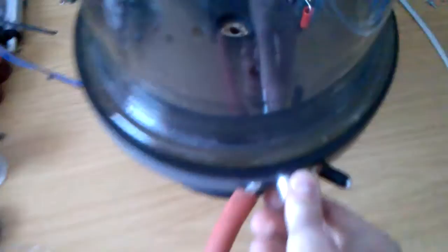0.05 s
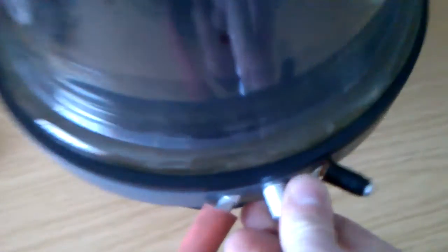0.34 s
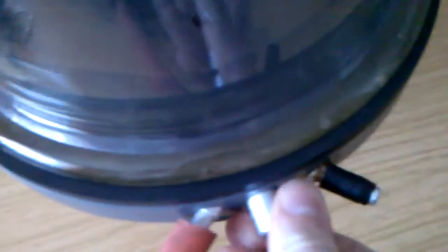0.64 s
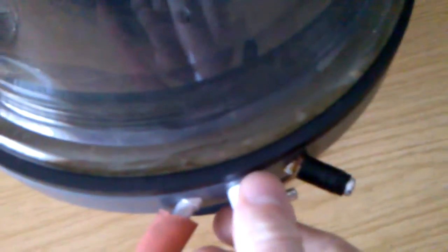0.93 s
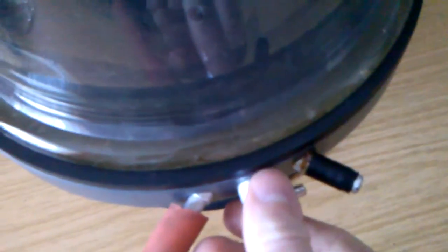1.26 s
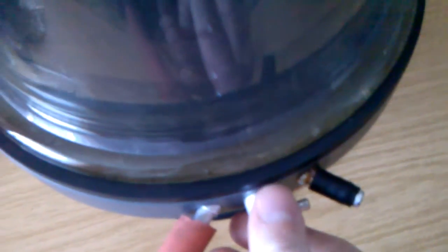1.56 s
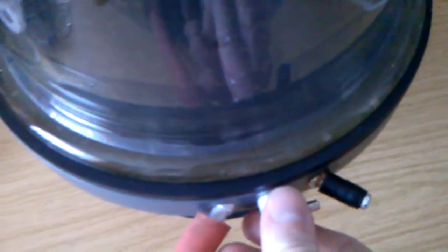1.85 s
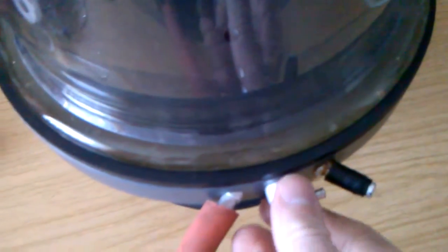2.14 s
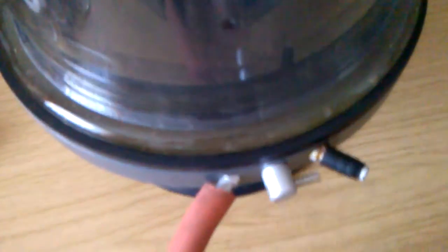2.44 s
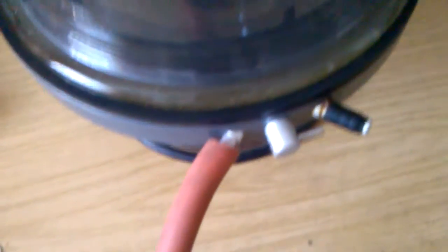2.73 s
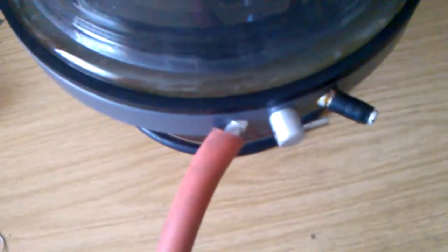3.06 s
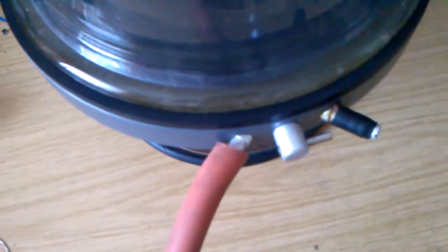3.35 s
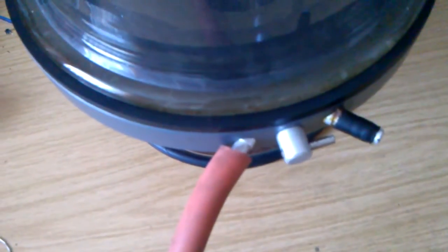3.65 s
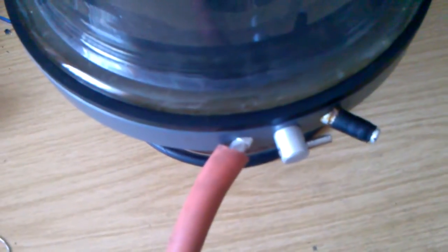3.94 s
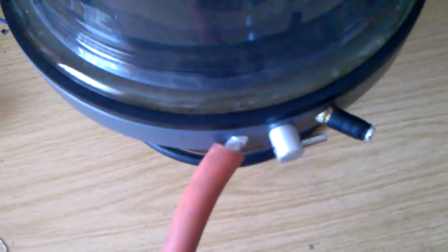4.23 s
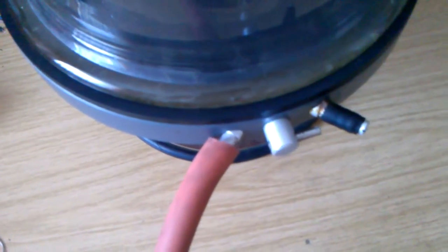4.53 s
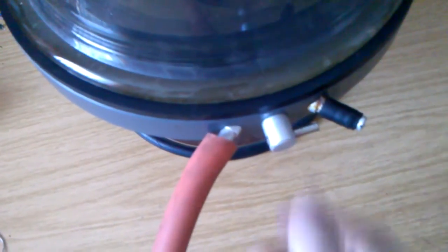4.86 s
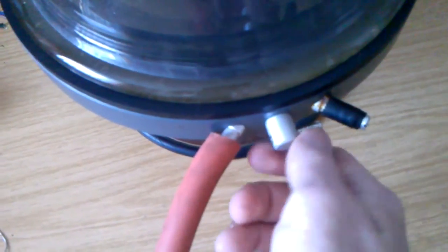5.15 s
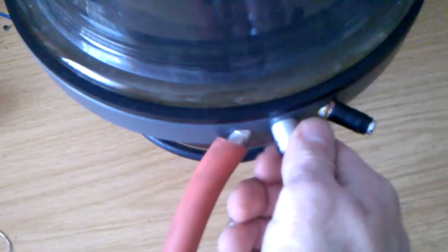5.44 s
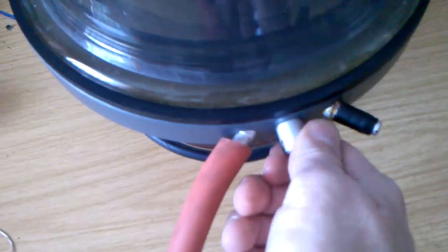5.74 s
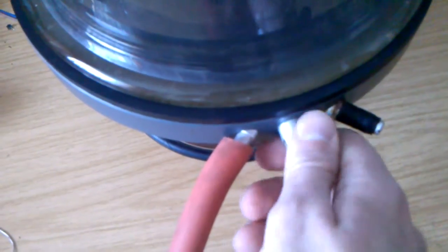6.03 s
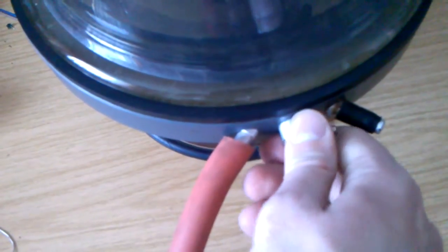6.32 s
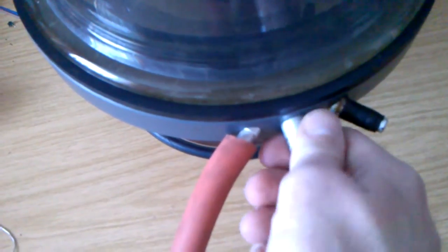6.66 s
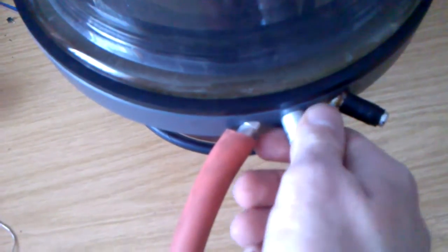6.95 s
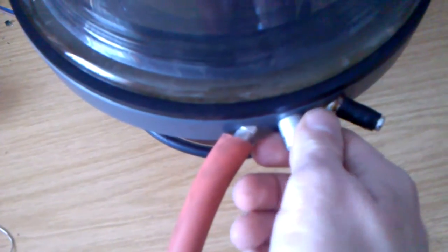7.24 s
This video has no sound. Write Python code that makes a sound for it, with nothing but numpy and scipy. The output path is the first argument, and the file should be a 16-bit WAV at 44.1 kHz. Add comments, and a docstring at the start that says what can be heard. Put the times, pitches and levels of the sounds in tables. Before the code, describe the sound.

Air rushes through a small screw valve on the base of a glass vacuum jar, making a loud, steady, high hiss. As the knob opens, a thin squeal and breathy whistles join in. The squeal dies away, and the main whistle gives way to higher ones. The hiss changes colour slightly as the hand lets go and returns. The microphone is close, with faint motor hum and room rumble underneath.

```python
"""Air rushes through a small screw valve on the base of a glass vacuum bell jar, over faint motor hum
and room rumble. The knob opens in the first half second: the jet hisses and squeals, and the valve's
passages ring with breathy tones. Near 2.4 s the hand lets go, shifting the echoes from fingers and
table that colour the hiss; three soft bumps follow. The main whistle fades as higher ones take over.
Near 4.6 s the hand returns, and the jet again rings the hollow of the fingers."""
import sys
import numpy as np
from scipy import signal
from scipy.fft import rfft, irfft, next_fast_len
from scipy.io import wavfile
from scipy.ndimage import map_coordinates

SR = 44100
rng = np.random.default_rng(int(sys.argv[2]) if len(sys.argv) > 2 else 0)


def master_out(mix):
    """Clip the mix to full scale and print it as 16-bit PCM to the path in sys.argv[1]."""
    frames = np.transpose(np.atleast_2d(mix))
    ceiling = np.clip(frames, -1, 1)
    pcm = np.round(ceiling * 32767).astype(np.int16)
    wavfile.write(sys.argv[1], SR, pcm)


N = 321489
TIME = np.arange(N) / SR


def amp(db):
    """Decibels to gain."""
    return 10 ** (np.asarray(db) / 20)


def unit(x):
    """Scale to rms 1."""
    return x / np.sqrt(np.mean(x ** 2) + 1e-20)


def ramp(start_s, length_s):
    """Linear rise from 0 to 1."""
    return np.clip((TIME - start_s) / length_s, 0, 1)


def curves(rows):
    """Per-sample curve for each column after the time."""
    times_s, *columns = np.transpose(rows)
    return [np.interp(TIME, times_s, column) for column in columns]


def wobble(rate_hz):
    """Smooth random curve with knots at rate_hz."""
    return map_coordinates(rng.standard_normal(int(N * rate_hz / SR) + 4), [TIME * rate_hz])


def filtered(x, response):
    """Apply the gain response(hz)."""
    size = next_fast_len(N + 8192)
    return irfft(rfft(x, size) * response(np.fft.rfftfreq(size, 1 / SR)), size)[..., :N]


def noise(spectrum):
    """Noise of rms 1, shaped by rows of freq_hz, relative_db."""
    freq_hz, db = np.transpose(spectrum)
    shape = lambda hz: amp(np.interp(np.log(hz + 1), np.log(freq_hz), db, left=-120, right=-120))
    return unit(filtered(rng.standard_normal(N), shape))


def ringing(modes):
    """Turbulence in narrow, steep-skirted resonances; rms 1."""
    def shape(hz):
        gains = [amp(db) / (1 + ((hz - pitch_hz) / width_hz) ** 2) for pitch_hz, width_hz, db in modes]
        return np.sqrt(sum(gain ** 2 for gain in gains))
    return unit(filtered(rng.standard_normal(N), shape))


def gliding(centre_hz, width_hz):
    """Noise in one resonance that may move; rms 1."""
    slow = filtered(rng.standard_normal((2, N)), lambda hz: 1 / (1 + (hz / width_hz) ** 2))
    phase = 2 * np.pi * np.cumsum(centre_hz * np.ones(N)) / SR
    return unit(slow[0] * np.cos(phase) + slow[1] * np.sin(phase))


# Motor and mains lines: pitch_hz, rms_db
HUM_LINES = [(50, -91), (100, -88), (120, -96.5), (199, -93.5)]

def motor_hum():
    """Motor and mains hum, slightly unsteady in level and phase."""
    hum = np.zeros(N)
    for pitch_hz, rms_db in HUM_LINES:
        peak = np.sqrt(2) * amp(rms_db + 1.8 * wobble(2.1))
        hum += peak * np.sin(2 * np.pi * pitch_hz * TIME + 0.67 * wobble(4.4))
    return hum


# Room rumble spectrum: freq_hz, relative_db
RUMBLE_SPECTRUM = [(12, -26), (20, 6.5), (59, -3.5), (267, -16.5), (600, -19), (780, -57), (1320, -120)]

def room_rumble():
    """Wavering rumble plus a faint, steady low-mid band."""
    rumble = amp(-70 + 0.7 * wobble(5.5)) * noise(RUMBLE_SPECTRUM)
    return rumble + amp(-87) * noise([(150, -12), (400, 2), (750, -1), (1500, -22)])


# Handling bumps: centre_s, level_db (before boost), pitch_hz
HANDLING_BUMPS = [(2.465, -58, 53.7), (3.211, -63, 56.5), (3.674, -59.5, 53.8)]

def bumps(width_s=0.0079, boost_db=4.5):
    """Each handling bump is one soft, low push."""
    pushes = np.zeros(N)
    for centre_s, level_db, pitch_hz in HANDLING_BUMPS:
        t = TIME - centre_s
        pushes += amp(level_db + boost_db) * np.exp(-(t / width_s) ** 2) * np.cos(2 * np.pi * pitch_hz * t)
    return pushes


def opening_db(shut_db=-11, turn_s=0.47):
    """Flow builds as the knob turns open, fast at first."""
    return shut_db * (1 - ramp(0, turn_s)) ** 1.7


def flow(open_db, drift_db_per_s):
    """Gain that rises with the opening and drifts as the jar's pressure changes."""
    return amp(open_db + opening_db() + drift_db_per_s * TIME)


# Resonance levels without swells: name -> level_db
RESTING_DB = {"bore": -61.5, "whistle": -63.5, "overtone": -72.5, "upper": -74.5, "seat": -63, "squeal":
              -82.5}
# Resonance swells: name, crest_s, half_width_s, rise_db
FLOW_SWELLS = [("bore", 0.49, 0.22, 3.8), ("bore", 1.47, 0.29, 3), ("bore", 6.3, 1.1, 1.9),
               ("whistle", 1.13, 1.46, 10.8), ("whistle", 0.57, .2, 2.7), ("whistle", 3.8, 1, 2.7),
               ("whistle", 5.2, 0.13, 3.1), ("overtone", 5.6, 4.8, 11.8), ("overtone", 3.05, 0.09, 4.3),
               ("upper", 4.1, 4.4, 15.6), ("seat", 3.7, 1.4, 4.9), ("seat", 2.22, 0.18, 5.8),
               ("squeal", 0.74, 1.2, 35)]

def drive(resonance, steepness=1.7):
    """Gain of a resonance: rises with the opening, swells while the flow suits it."""
    swell_db = sum(rise_db / (1 + ((TIME - crest_s) / half_width_s) ** 2)
                   for name, crest_s, half_width_s, rise_db in FLOW_SWELLS if name == resonance)
    return amp(RESTING_DB[resonance] + steepness * opening_db() + swell_db)


# Rush spectra in the passages: freq_hz, relative_db
LOW_SPECTRUM = [(400, -27), (560, -10), (760, -4.5), (830, 2.5), (900, 3), (960, -5.5), (1040, 3.5),
                (1250, -6.5), (1600, -25)]
MID_SPECTRUM = [(800, -55), (1150, -3), (1400, -3.5), (1650, 2), (2050, -1), (2300, -4), (2900, -61)]
BORE_SPECTRUM = [(1900, -28), (2350, -3), (2600, -5.5), (3100, -1.5), (3340, -9.5), (3740, -14.5),
                 (3870, -5.5), (4400, -17)]
# Bore resonances: pitch_hz, half_width_hz, relative_db
BORE_RESONANCES = [(1222, 53, -19.5), (1552, 21, -8.5), (2446, 15, -2), (2711, 19.7, 1), (2904, 18, -3)]

def passages():
    """Duller rush inside valve and base; the low band fades as the middle band grows."""
    low = flow(open_db=-69, drift_db_per_s=-0.65) * noise(LOW_SPECTRUM)
    middle = flow(open_db=-66.5, drift_db_per_s=0.66) * noise(MID_SPECTRUM)
    bore = drive("bore", steepness=0.98) * noise(BORE_SPECTRUM)
    ring = flow(open_db=-62, drift_db_per_s=0.05) * ringing(BORE_RESONANCES)
    return low + middle + bore + ring


# Whistling resonances of the passages: pitch_hz, half_width_hz, relative_db
WHISTLE_MODES = [(3514, 19, -1), (3574, 33, 0), (3628, 20, -6)]
OVERTONE_MODES = [(4670, 26, 0), (4843, 24, -9)]
UPPER_MODES = [(5092, 27, 0), (5205, 26, -10), (5407, 30, -3), (5727, 40, -7)]
SEAT_MODES = [(6043, 26, -7), (6200, 55, 0)]

def whistles(waver_db=1.0):
    """Breathy tones, each wavering on its own; the main one fades and higher ones take over."""
    tones = {"whistle": WHISTLE_MODES, "overtone": OVERTONE_MODES,
             "upper": UPPER_MODES, "seat": SEAT_MODES}
    return sum(drive(name) * amp(waver_db * wobble(10)) * ringing(modes) for name, modes in tones.items())


def squeal():
    """The jet squeals in the narrow gap, loudest early on."""
    return drive("squeal") * gliding(centre_hz=13230, width_hz=110)


# Finger moves at the knob: start_s, length_s, glide_s, from_hz, to_hz, half_width_hz, level_db
FINGER_MOVES = [(.23, 0.63, 0.67, 13900, 10900, 650, -41.5), (.72, 1.6, .15, 10960, 10660, 260, -45.5),
                (2.27, .13, .1, 14100, 12500, 2000, -47), (4.87, 0.1, 0.11, 8600, 9700, 384, -44),
                (5.05, .38, .15, 10700, 11200, 600, -48), (5.953, 0.19, .2, 9750, 9600, 350, -42)]

def finger_hollow(attack_s=0.039, release_s=0.09, sag_db_per_s=6.5):
    """The jet rings the hollow of the fingers; each move glides, slows and fades."""
    ring = np.zeros(N)
    for start_s, length_s, glide_s, from_hz, to_hz, half_width_hz, level_db in FINGER_MOVES:
        pitch_hz = to_hz + (from_hz - to_hz) * (1 - ramp(start_s, glide_s)) ** 2
        gate = ramp(start_s, attack_s) * (1 - ramp(start_s + length_s - release_s, release_s))
        sag_db = sag_db_per_s * length_s * ramp(start_s, length_s)
        ring += gate * amp(level_db - sag_db) * gliding(pitch_hz, half_width_hz)
    return ring


def glass_scatter(x, wet_db=-8, t60_s=0.018):
    """Short spray of reflections from the glass; changes as hand and microphone move."""
    t = TIME[:SR // 20]
    tails = rng.standard_normal((3, len(t))) * amp(-60 * t / t60_s) * (t > 0.0015)
    sprays = signal.fftconvolve(x[None], tails / np.linalg.norm(tails[0]), axes=1)[:, :N]
    shares = np.array([wobble(1) for _ in sprays])
    return amp(wet_db) * (sprays * shares).sum(0) / np.linalg.norm(shares, axis=0)


def echo(x, delay_s):
    """One reflection with a moving delay."""
    oversampled = signal.resample_poly(x, 4, 1)
    return np.interp(TIME - delay_s, np.arange(len(oversampled)) / (4 * SR), oversampled)


def holding(back_s, let_go_s=2.42, reach_s=0.34):
    """1 with the knob held, 0 from let_go_s to back_s."""
    return 1 - ramp(let_go_s - reach_s / 2, reach_s) + ramp(back_s - reach_s / 2, reach_s)


def table_echo(x, back_s):
    """The table combs the hiss; its echo is earlier and stronger from letting go until back_s."""
    held = holding(back_s)
    delay_ms = np.interp(held, [0, 1], [0.697, 0.729])
    gain = np.interp(held, [0, 1], [0.33, 0.2])
    return gain * echo(x, delay_ms / 1000)


# Echo path via the fingers, beyond the direct path: time_s, extra_cm
FINGER_DETOUR = [(0, 7.3), (2.3, 7.1), (2.6, 14), (4.7, 14), (4.87, 8.1), (5.25, 6.2), (6.2, 3.9)]

def finger_echo(x, back_s, mirror_cm=0.65, sound_cm_per_s=34300):
    """The fingers comb the hiss, stronger when nearer; the approaching palm briefly mirrors it."""
    extra_cm, = curves(FINGER_DETOUR)
    fingers = holding(back_s) * mirror_cm / extra_cm
    palm = 0.19 * np.exp(-((TIME - 4.88) / 0.1) ** 2)
    return (fingers + palm) * echo(x, extra_cm / sound_cm_per_s)


# Jet spectrum: freq_hz, relative_db
HISS_SPECTRUM = [(3300, -29), (3950, -21.5), (4400, -15), (4950, -20.5), (5700, -16.5), (6400, -11),
                 (7200, -6.5), (8200, 0.1), (9700, 1), (10700, 1.5), (12200, -3), (13400, -8.5),
                 (14700, -3), (15700, -6.5)]
# Jet band levels: time_s, core_db, edge_relative_db, top_relative_db
JET_LEVELS = [(0.0, -44.5, -5, 0), (0.06, -41, -10.5, -0.5), (0.38, -39, -9, -2.5), (0.83, -39.5, -9, -5),
              (0.87, -40, -8, -1), (1.38, -40, -9, -2.5), (2.21, -41.5, -9, -2), (2.31, -39, -15, -1),
              (2.48, -42, -9, -1.5), (2.52, -40, -12, -3.5), (2.76, -41.5, -8.5, -0.5),
              (3.71, -41.5, -10, -1.5), (4.85, -42, -8, -1), (4.87, -44, -10, -1), (4.91, -41, -9, -3),
              (5.0, -43, -7.5, -4), (5.04, -40.5, -6, -5), (5.16, -39, -8.5, -3), (5.79, -39.5, -9, -3.5),
              (6.01, -38, -9, -4), (6.42, -41, -8, -0.5), (6.58, -38.5, -10, -3), (6.76, -41.5, -6, 0),
              (7.29, -39, -6.5, -2.5)]

def jet(edge_hz=8000, top_hz=12000, return_s=4.6, settle_s=0.47):
    """Hiss at the valve, combed by nearby surfaces; its lower edge and top shift against its core."""
    core_db, edge_db, top_db = curves(JET_LEVELS)
    direct = noise(HISS_SPECTRUM)
    table = table_echo(direct, return_s + settle_s)  # the microphone moves back in after the hand
    hiss = direct + table + finger_echo(direct, return_s) + glass_scatter(direct)
    edge = filtered(hiss, lambda hz: np.clip(0.5 + (edge_hz - hz) / 800, 0, 1))
    top = filtered(hiss, lambda hz: np.clip(0.5 + (hz - top_hz) / 800, 0, 1))
    core = hiss - edge - top
    edge_gain = amp(edge_db + 0.38 * opening_db())
    top_gain = amp(top_db + 0.46 * wobble(60))
    gain = amp(core_db + 0.43 * wobble(45))
    return gain * (unit(core) + edge_gain * unit(edge) + top_gain * unit(top))


def scene():
    """One microphone feeds both channels."""
    valve = jet() + squeal() + finger_hollow() + passages() + whistles()
    mix = valve + motor_hum() + room_rumble() + bumps()
    return np.array([mix, mix])


def record(dry):
    """Brick-wall low-pass."""
    return filtered(dry, lambda hz: hz < 15830)


dry = scene()
out = record(dry)
master_out(out)
```